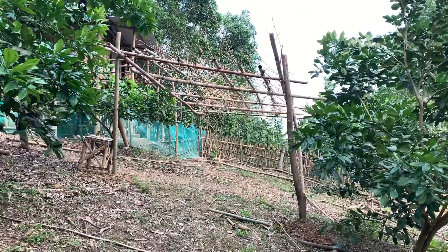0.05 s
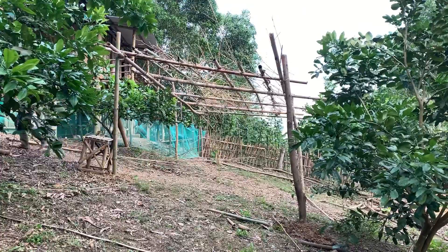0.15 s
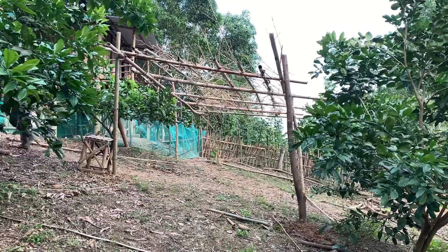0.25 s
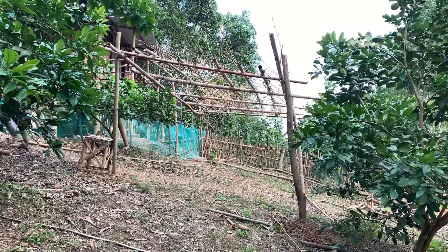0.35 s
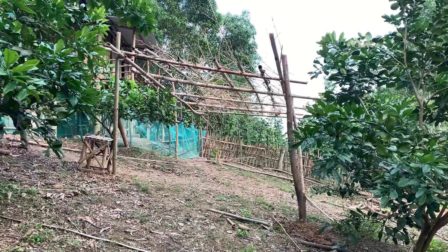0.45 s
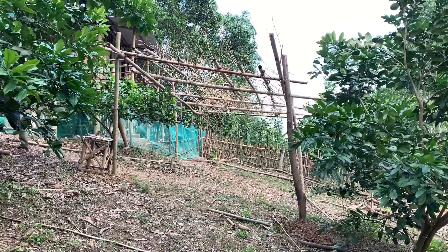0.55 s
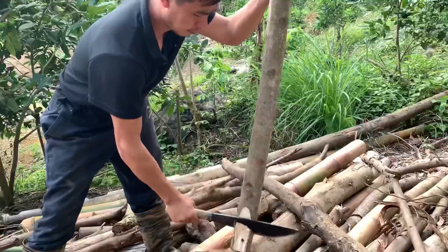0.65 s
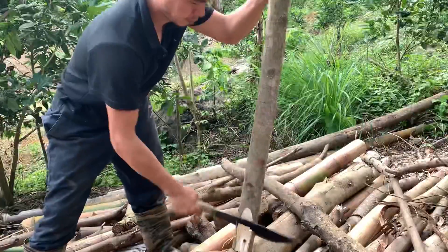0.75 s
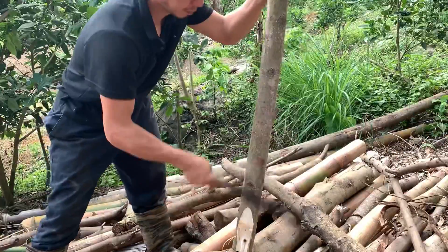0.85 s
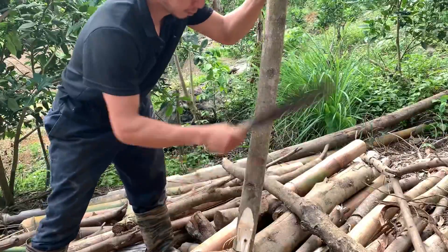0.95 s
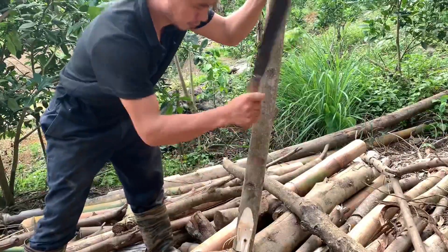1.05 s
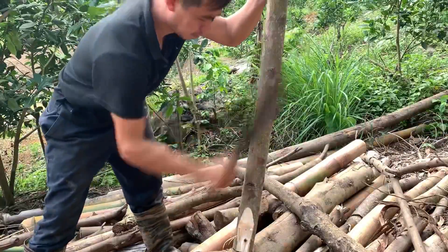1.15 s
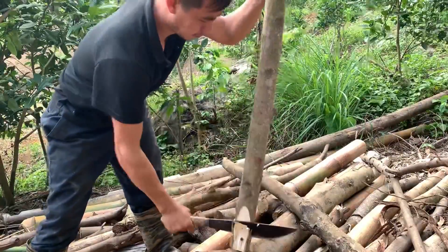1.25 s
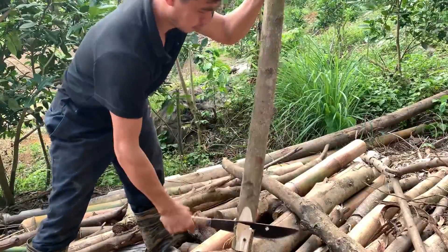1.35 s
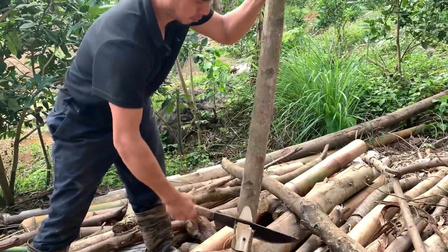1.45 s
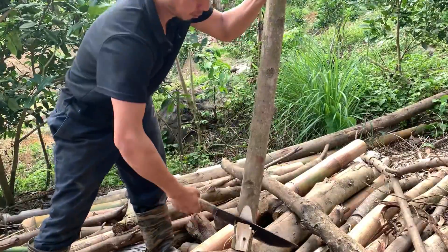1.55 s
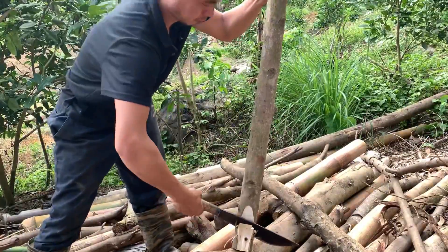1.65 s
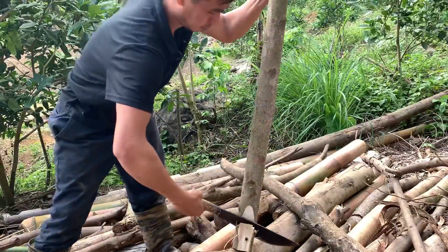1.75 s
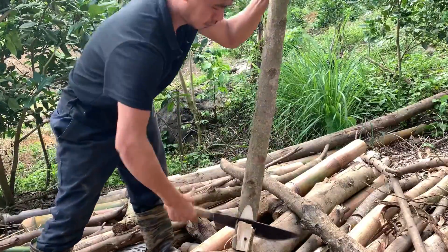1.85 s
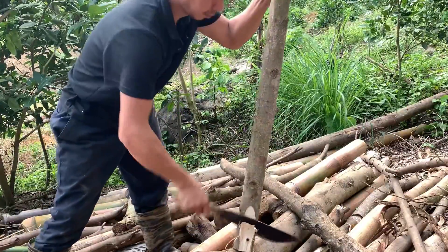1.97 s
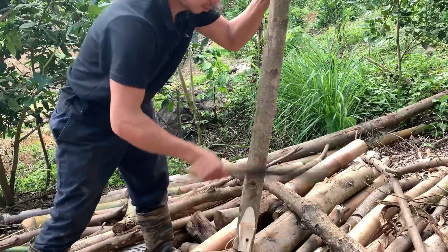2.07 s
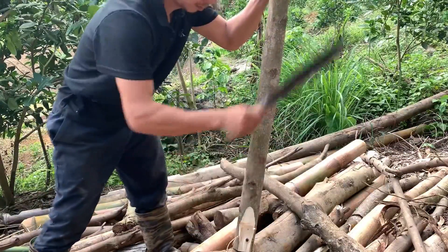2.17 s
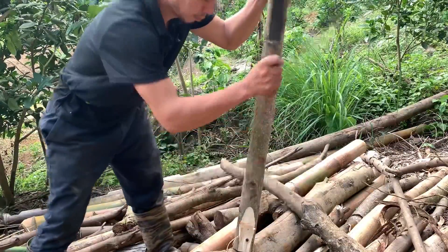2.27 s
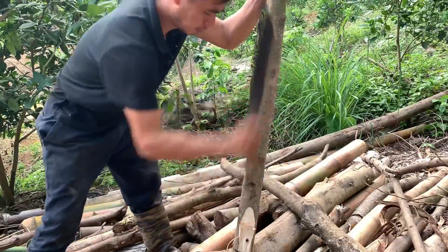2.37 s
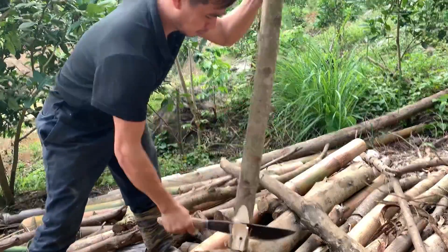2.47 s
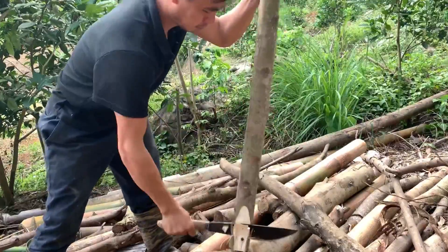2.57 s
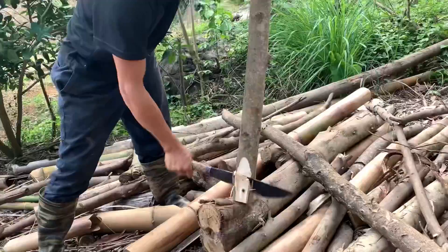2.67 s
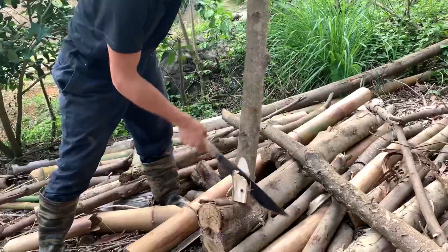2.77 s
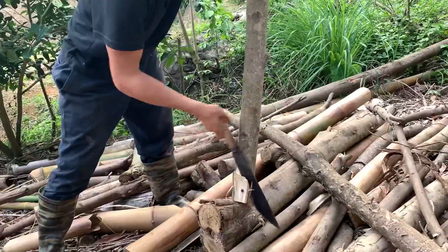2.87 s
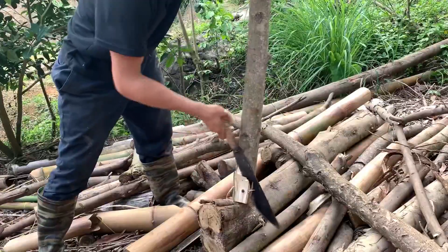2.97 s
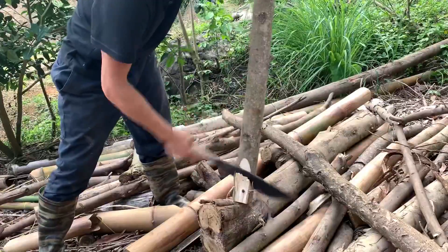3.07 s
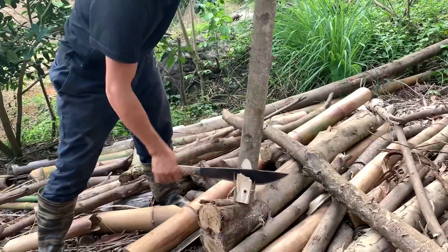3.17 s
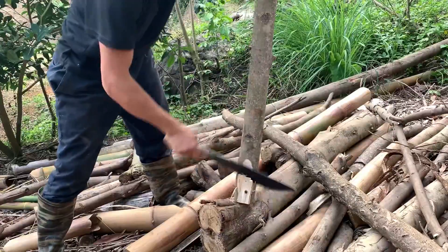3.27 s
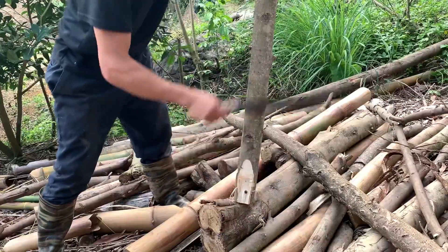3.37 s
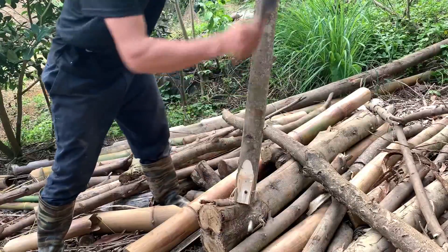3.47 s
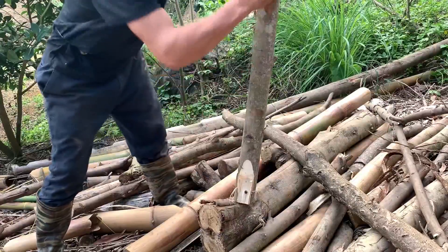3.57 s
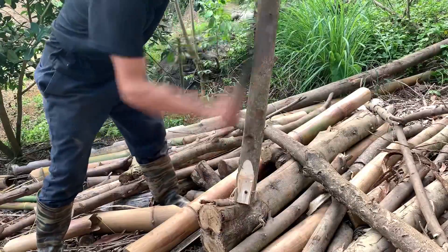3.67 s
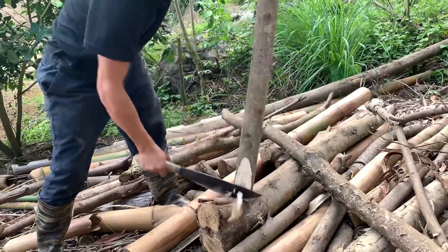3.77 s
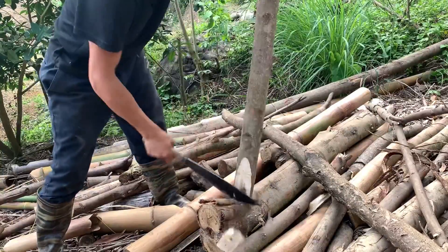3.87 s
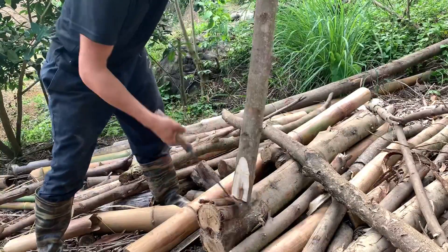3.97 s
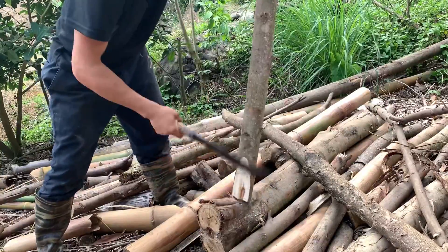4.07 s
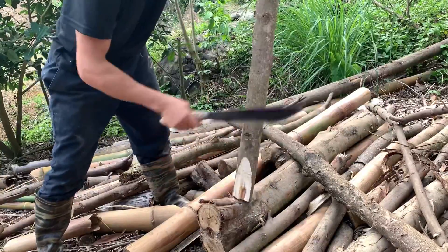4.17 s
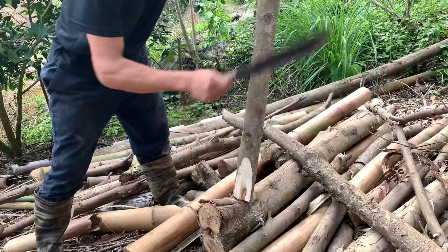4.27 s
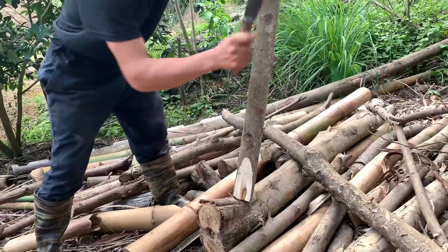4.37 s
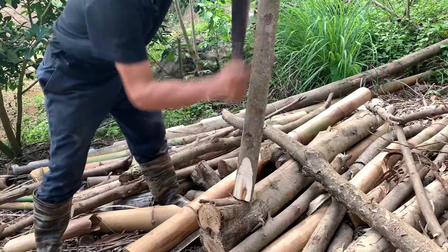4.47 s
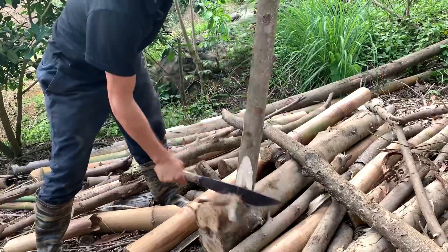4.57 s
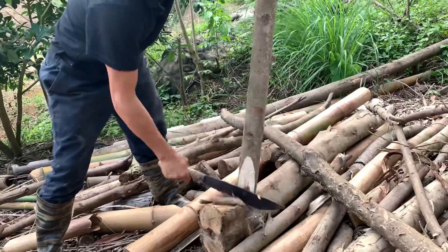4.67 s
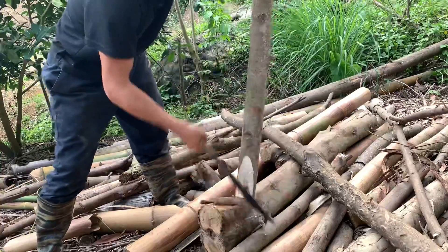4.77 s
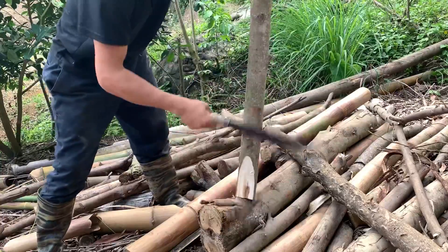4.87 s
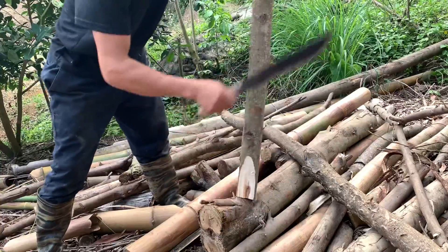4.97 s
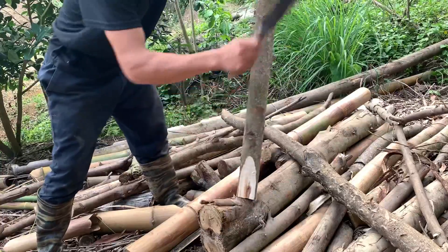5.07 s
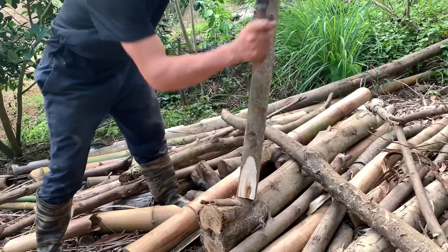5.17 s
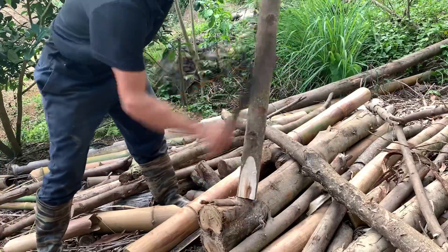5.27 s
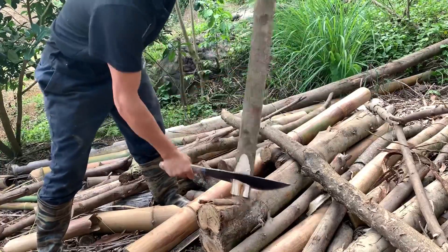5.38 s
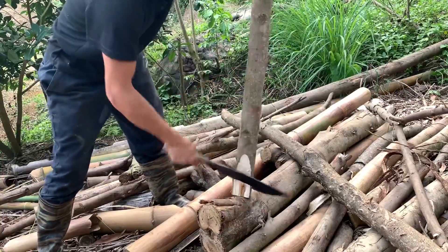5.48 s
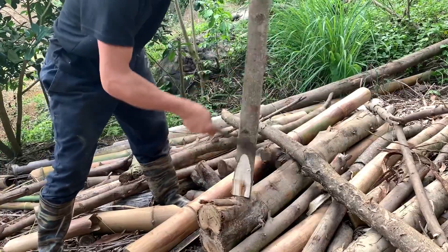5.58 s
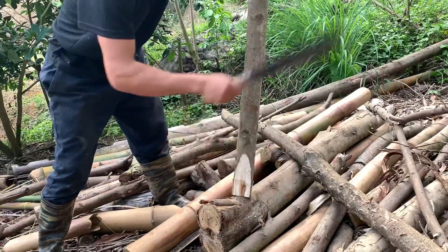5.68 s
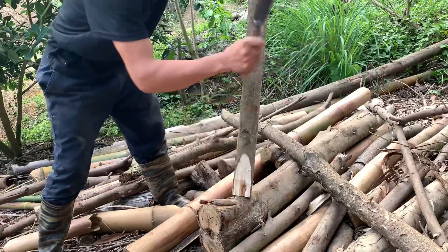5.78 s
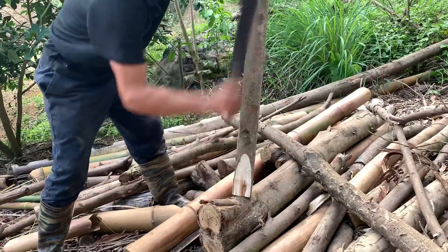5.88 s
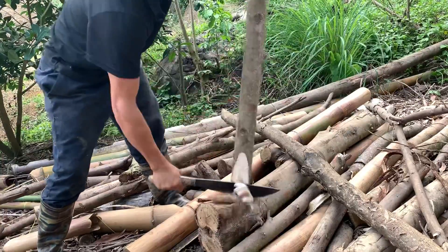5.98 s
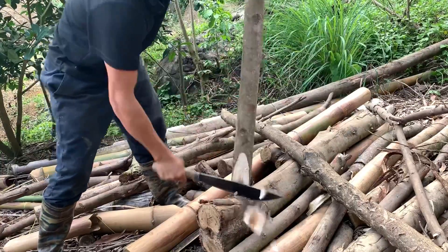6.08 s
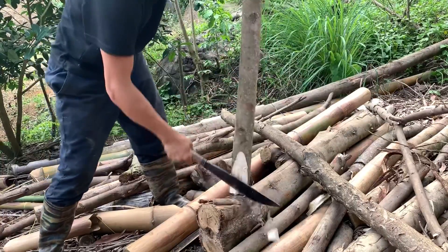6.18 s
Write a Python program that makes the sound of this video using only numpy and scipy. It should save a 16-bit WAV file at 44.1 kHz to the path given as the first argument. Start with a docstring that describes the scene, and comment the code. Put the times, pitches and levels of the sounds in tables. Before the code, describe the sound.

Soft bird hoots over faint insect hiss, then a heavy knife chops green wood in seven sharp, irregular blows as wind buffets the microphone.

```python
"""Calm orchard air with hissing insects: a far bird hoots softly, in near-pure tones with throbbing side tones.
At 0.6 s the scene cuts to a second, windier one: coloured noise in eddies and pops buffets the microphone,
the leaf hiss is louder, and a heavy knife trims the end of a green pole on a log pile in seven blows: short
rising noise, bursts of grainy tearing, a knock and a thud ringing damped wood modes, a short scattered tail.
Small clicks and notes sound around the blows, some of them the blows' own knocks; soft taps ring the steel."""
import sys
import numpy as np
from scipy import signal
from scipy.fft import rfft, irfft, next_fast_len
from scipy.io import wavfile
from scipy.ndimage import uniform_filter1d

SR = 44100
rng = np.random.default_rng(int(sys.argv[2]) if len(sys.argv) > 2 else 0)


def unload_wav(signal):
    """Save mono or channel-first audio to the path in sys.argv[1] as 16-bit WAV at rate SR, clipped to [-1, 1]."""
    wavfile.write(
        sys.argv[1],
        SR,
        np.round(np.clip(np.atleast_2d(signal).T, -1, 1) * 32767).astype(np.int16),
    )


N = 274743

# knife blows: (t/s, cut length/s, entry splinter level/dB, split splinter level/dB, snap level/dB, tear level/dB,
# edge delay/s, edge level/dB, edge centre f/Hz, knock level/dB, knock centre f/Hz,
# thud delay/s, thud level/dB, thud pitch f/Hz)
KNIFE_BLOWS = [(0.6208, 0.0054, 5, -8, -22, -19, 0.0013, -22, 1460, -19.5, 1230, 0.0085, -25, 357),
               (1.2045, 0.0082, -18, 6.5, 7.5, 1, 0.0025, -15, 1275, -7.5, 1250, 0.014, -12.5, 302),
               (2.441, 0.0089, -5, 3, -13, 5.5, 0.0073, -20, 1730, -15, 960, 0.014, -14, 238),
               (3.7316, 0.0061, 0.5, 10, -9, 8.5, 0.0022, -8, 1510, -11, 920, .008, -27, 504),
               (4.5706, 0.018, 8.5, 11, 7, 1.5, 0.00169, -11, 1020, -3, 424, .018, 3, 393),
               (5.332, 0.005, -18, 14, -2, 6, 0.0024, -35, 1330, -14, 1330, 0.0053, -7.5, 665),
               (5.976, 0.0066, 3.5, 15.5, -3, 11, 0.0036, -9.5, 1370, -9, 870, .007, -8, 670)]


def amp(db):
    """Decibels to gain."""
    return 10 ** (np.asarray(db) / 20)


def in_time(rows):
    """Columns of a (t/s, ...) curve, interpolated at every sample."""
    s, *columns = np.transpose(rows)
    return [np.interp(np.arange(N) / SR, s, c) for c in columns]


def noise(spectrum, channels=1):
    """Independent noise per channel, coloured by a (f/Hz, relative level/dB) spectrum; rms 1."""
    hz, db = np.transpose(spectrum)
    size = next_fast_len(N)
    log_grid = np.log(np.fft.rfftfreq(size, 1 / SR) + 1)
    colour = amp(np.interp(log_grid, np.log(hz), db))
    out = irfft(rfft(rng.standard_normal((channels, size))) * colour)[:, :N]
    return out / out.std()


def drift(rate_hz):
    """Slow random signal of standard deviation 1: white noise through two equal poles."""
    r = np.exp(-2 * np.pi * rate_hz / SR)
    slow = signal.lfilter([1], [1, -2 * r, r * r], rng.standard_normal(N + SR))[SR:]
    return slow / slow.std()


def butter(x, hz, kind, order=2):
    """Butterworth filter."""
    return signal.sosfilt(signal.butter(order, hz, kind, fs=SR, output="sos"), x)


def lump(t, rise_s):
    """Rises to 1 in rise_s, then dies away."""
    return t / rise_s * np.exp(1 - t / rise_s)


def add(track, s, sound):
    """Lay a sound into a track at s seconds."""
    at = round(s * SR)
    track[..., at:at + sound.shape[-1]] += sound[..., :N - at]


def ring(force, hz, t60_s):
    """Damped resonator: a unit click sets off a sinusoid of height 1."""
    r, w = amp(-60 / (t60_s * SR)), 2 * np.pi * hz / SR
    return signal.lfilter([.5, 0, -.5], [1, -2 * r * np.cos(w), r * r], force + 1e-18)


def contacts():
    """Entry, bite, split with a snap, stop and thud on the log, closely overlapping, each at its own delay."""
    split_share = 0.61   # how far through the cut the wood splits
    edge_share = 0.33   # rise of the edge's bite, as a share of the cut
    entry_tear_db = -17.5   # against the blow's tear
    entry_s, split_s, snap_s, stop_s = .003, .002, .0004, .0026   # rise times
    rows, off = [], -np.inf
    for (s, cut_s, entry_db, split_db, snap_db, tear_db, edge_lag_s, edge_db, edge_hz,
         knock_db, knock_hz, thud_lag_s, thud_db, thud_hz) in KNIFE_BLOWS:
        split = s + split_share * cut_s
        rows += [(s, tear_db + entry_tear_db, entry_db, off, edge_hz, off, thud_hz, entry_s),
                 (s + edge_lag_s, off, off, edge_db, edge_hz, off, thud_hz, edge_share * cut_s),
                 (split, snap_db, off, off, edge_hz, off, thud_hz, snap_s),
                 (split, tear_db, split_db, off, edge_hz, off, thud_hz, split_s),
                 (s + cut_s, off, off, knock_db, knock_hz, off, thud_hz, stop_s),
                 (s + thud_lag_s, off, off, off, knock_hz, thud_db, thud_hz, stop_s)]
    return rows


def small_contacts():
    """Each small contact clicks, then the wood answers with one short note."""
    # small clicks and notes around the blows, some of them the blow's own knocks:
    # (t/s, click level/dB, splinter level/dB, knock level/dB, knock centre f/Hz)
    small_rows = [(0.748, -53, -18, -66, 710), (0.76, -57, -0.5, -57, 2430), (0.7744, -50, -0.5, -44, 1730),
                  (1.499, -57, -21, -62, 1410), (1.533, -56, -18, -62, 1320), (1.5946, -2.5, 6, -33, 1190),
                  (1.6124, -47, -27, -63, 1080), (1.64, -16.5, -6, -39, 2480), (1.659, -24, -11, -49, 1380),
                  (1.6628, -22.5, -8, -74, 719), (1.6896, -29, -14.5, -57, 783),
                  (2.302, -60, -22, -73, 1400), (2.437, -60, -42, -27, 760), (2.742, -52, -19, -50, 1930),
                  (2.791, -60, -50, -48, 1070), (2.806, -62, -17, -47, 1070),
                  (2.8393, -51, 11.5, -32.5, 1380), (3.1417, -22.5, -23, -51, 725),
                  (3.286, -28, -62, -68, 710), (3.752, -19, -4, -21.5, 715),
                  (3.933, -20.5, -17.5, -32, 2340), (3.938, -36, -27, -56, 1900),
                  (4.076, -60, -60, -33.5, 1330), (4.0811, -13, -57, -30, 845),
                  (4.1732, -24.5, -19, -50, 714), (4.724, -50, -45, -42.5, 1920),
                  (4.734, -44, -25, -42, 1620), (4.833, -48, -19.5, -73, 740), (5.16, -56, -16.5, -70, 740),
                  (5.5118, -19, 1, -38.5, 1330), (5.531, -73, -1.5, -48, 736),
                  (6.1744, -46, -60, -37.5, 1250)]
    click_s, knock_lag_s, knock_s = .0011, 0.004, 0.00076   # rise of click; delay and rise of knock
    rows, off = [], -np.inf
    for s, click_db, splinter_db, knock_db, knock_hz in small_rows:
        rows += [(s, click_db, splinter_db, off, knock_hz, off, knock_hz, click_s),
                 (s + knock_lag_s, off, off, off, knock_hz, knock_db, knock_hz, knock_s)]
    return rows


def fibre_bands():
    """Grainy tearing noise, split into a low tear band and a high splinter band, each of peak 1."""
    # colour of tearing fibres: (f/Hz, relative level/dB per Hz)
    tear_spectrum = [(300, -57), (900, -14), (1500, -28), (2500, -14), (4000, -4.5), (5500, -8.5),
                     (8200, -11.5), (10000, -10), (13500, -11), (15000, -12), (16500, -10.5)]
    fibres = noise(tear_spectrum)[0] * amp(2.12 * drift(450))
    tear = butter(fibres, 6340, "low", order=4)
    splinter = butter(fibres, 6740, "high", order=6)
    return np.array([tear / np.abs(tear).max(), splinter / np.abs(splinter).max()])


def blows(rows, spread_db, detune, tail_db, flutter_db, focus_db, sustain):
    """Fibres tear in a swell of grainy noise; an uneven push rings wood modes near the knock and thud pitches."""
    # pole and pile, damped by green wood: (f/Hz, relative level/dB, t60/s before sustain)
    wood_modes = [(195, 7.5, 0.06), (285, 1, 0.045), (392, -5, 0.15), (530, 0, 0.03), (615, 1, .025),
                  (700, 2.5, 0.03), (845, -1, 0.042), (965, -1, .03), (1075, -1, 0.025), (1225, -3, 0.016),
                  (1410, 1.5, 0.02), (1720, 2, 0.024), (1960, -4, 0.018), (2270, -6, 0.016),
                  (2770, -4, .012)]
    tear_sharpness = 1.4   # fibres fall silent sooner than the push
    knock_focus_db = 12   # loss an octave away from the knock's centre
    flutter_rate_hz, flutter_above_hz = 70, 450   # higher rings flutter in level
    crumb_db, crumb_s, crumb_spread_db, crumb_rate_hz = -23.5, 0.011, 7, 250   # cracking after a tear
    t, out = np.arange(SR // 4) / SR, np.zeros(N)
    bands = fibre_bands()
    usual = bands.std(1)
    crumbs = bands[0] * amp(crumb_db + crumb_spread_db * drift(crumb_rate_hz))
    mode_hz, mode_db, mode_t60 = np.transpose(wood_modes)
    flutter = drift(flutter_rate_hz)
    flutter_share = np.clip(np.log2(mode_hz / flutter_above_hz), 0, 1)[:, None]
    for s, tear_db, splinter_db, knock_db, knock_hz, thud_db, thud_hz, rise_s in rows:
        at = min(round(s * SR), N - len(t))
        swell = lump(t, rise_s)
        onset = 1 - np.exp(-t / rise_s)

        # each tear gets the energy its swell has on average
        tear_swell = swell ** tear_sharpness
        torn = tear_swell * bands[:, at:at + len(t)]
        evened = usual * np.linalg.norm(tear_swell) / np.linalg.norm(torn, axis=1)
        sound = (amp([tear_db, splinter_db]) * evened) @ torn
        sound = sound + amp(tear_db) * crumbs[at:at + len(t)] * onset * np.exp(-t / crumb_s)

        # the pile keeps rattling briefly
        shaking = swell + amp(tail_db) * onset * np.exp(-t / .016)
        push = rng.standard_normal(len(t)) * shaking
        level_chance, pitch_chance = rng.standard_normal((2, len(wood_modes)))
        knock = amp(knock_db - knock_focus_db * np.log2(mode_hz / knock_hz) ** 2)
        thud = amp(thud_db - focus_db * np.log2(mode_hz / thud_hz) ** 2)
        strength = (knock + thud) * amp(mode_db + spread_db * level_chance)
        pitch_hz = mode_hz * (1 + detune * pitch_chance)   # the pole rests differently every time
        rings = np.array([ring(push, hz, sustain * t60) for hz, t60 in zip(pitch_hz, mode_t60)])
        starts = rng.integers(0, N - len(t), (len(wood_modes), 1))
        rings = rings * amp(flutter_db * flutter_share * flutter[starts + np.arange(len(t))])
        add(out, s, sound + (strength / np.abs(rings).max(1)) @ rings)
    return out


def lead_in_noise():
    """Short band noise rising exponentially just before each blow."""
    level_db, rise_s, band_hz = -31.5, 0.003, [970, 6730]
    t, growth = np.arange(SR // 20) / SR, np.zeros(N)
    for s, *_ in KNIFE_BLOWS:
        add(growth, s - t[-1], np.exp((t - t[-1]) / rise_s))
    band = butter(rng.standard_normal(N), band_hz, "band")
    return amp(level_db) * growth * band / band.std()


def blade():
    """Soft taps leave thin, decaying steel tones."""
    # light taps on the steel: (t/s, level of each blade mode/dB x 3)
    tap_rows = [(0.821, -42, -41, -48), (3.274, -41.5, -75, -75), (6.176, -36, -84, -77)]
    # blade modes: (f/Hz, t60/s)
    steel_modes = [(7865, .17), (9658, .14), (13210, .16)]
    out, t = np.zeros(N), np.arange(SR // 4) / SR
    for s, *levels_db in tap_rows:
        for (hz, t60), db in zip(steel_modes, levels_db):
            envelope = amp(db - 60 * t / t60) * (1 - np.exp(-t / .003))
            add(out, s, envelope * np.sin(2 * np.pi * hz * t + rng.uniform(0, 2 * np.pi)))
    return out


def ports(x):
    """Each port hears its own ground echo; the left one falls behind in the treble and is shaded in two bands."""
    # ground echo, rows left and right: (delay/s, level/dB)
    ground_echoes = [(.00031, -20), (.0004, -47)]
    # all-passes that delay the left port by a full cycle: (f/Hz, width/Hz)
    phase_turns = [(8600, 1200), (11700, 2000), (15000, 2200)]
    left, right = (x + amp(db) * np.interp(np.arange(N) - lag_s * SR, np.arange(N), x)
                   for lag_s, db in ground_echoes)
    for hz, width_hz in phase_turns:
        r, w = np.exp(-np.pi * width_hz / SR), 2 * np.pi * hz / SR
        poles = [1, -2 * r * np.cos(w), r * r]
        left = signal.lfilter(poles[::-1], poles, left)
    low_shade = 0.32 * butter(left, [550, 1000], "band", order=1)
    high_shade = 0.68 * butter(left, [4500, 8000], "band", order=1)
    return np.array([left - low_shade - high_shade, right])


def scatter(x, t60_low_s, t60_high_s, high_db):
    """Logs and leaves send back a short, lumpy noise tail with its own decay in the treble."""
    lump_db, lump_rate_hz = 4, 120   # the tail's level fluctuates unevenly
    t = np.arange(SR // 3) / SR
    lumps = amp(lump_db * drift(lump_rate_hz)[:2 * len(t)].reshape(2, -1))
    white = rng.standard_normal((2, len(t))) * (1 - np.exp(-t / 0.00043)) * lumps
    low = butter(white, [500, 2500], "band", order=1) * amp(-60 * t / t60_low_s)
    high = butter(white[::-1], [2500, 13000], "band") * amp(high_db - 60 * t / t60_high_s)
    echoes = signal.fftconvolve(x[None], low + high, axes=1)[:, :N]
    return echoes * amp(lump_db * drift(lump_rate_hz))


def wind():
    """Steady turbulence plus single eddies that thump in and die away; the same pressure reaches both sides."""
    # wind on the microphone, before eddies and drift: (t/s, steady buffet level/dB)
    steady_curve = [(0, -61), (.57, -57.5), (.63, -37.5), (1.0, -55.5), (1.1, -39), (2.4, -41),
                    (2.95, -38.5), (3.15, -34), (3.7, -29.5), (3.85, -34.5), (4.1, -32), (4.55, -31),
                    (4.7, -31.5), (5.1, -29.5), (6.23, -29.5)]
    # colour of the deep buffet: (f/Hz, relative level/dB per Hz)
    buffet_spectrum = [(20, -51.5), (35, -8.5), (55, 1), (90, 0), (140, -6), (220, -20), (400, -54.5)]
    # colour of the brighter roar: (f/Hz, relative level/dB per Hz)
    roar_spectrum = [(60, -16.5), (120, -8.5), (170, 0.5), (260, -5), (400, -14.5), (600, -29.5),
                     (900, -70.5)]
    # strong eddies: (t/s, buffet level/dB, roar level/dB)
    eddy_rows = [(0.651, -51, -35), (0.891, -42, -49), (1.042, -28, -49), (1.294, -52, -38.5),
                 (1.534, -32, -54), (1.824, -52, -50), (2.558, -30, -45), (2.821, -30, -46),
                 (3.012, -28.5, -46), (3.149, -29, -31), (3.189, -22.5, -25), (3.318, -33.5, -61),
                 (3.391, -24.5, -26.5), (3.416, -25, -37), (3.458, -37, -36), (3.609, -20.5, -36),
                 (3.918, -28.5, -44), (4.258, -31.5, -34), (4.352, -38, -59), (4.445, -30.5, -42),
                 (4.522, -25.5, -39), (4.907, -36, -42), (5.06, -26, -26.5), (5.239, -35, -33.5),
                 (5.305, -45, -27), (5.435, -35, -26.5), (5.61, -37, -38), (5.74, -58, -24.5),
                 (5.791, -41, -40), (5.867, -31, -50), (6.044, -46, -31.5), (6.11, -58, -63),
                 (6.176, -26.5, -62)]
    roar_db, roar_slope = -33.5, 1.91   # roar at a buffet of -29 dB; dB of roar per dB of buffet
    eddies_per_s, eddy_db, eddy_spread_db = 13, -13.5, -11   # lesser random eddies, against the steady wind
    steady_db, = in_time(steady_curve)
    t = np.arange(SR // 4) / SR
    born = (rng.random(N) < eddies_per_s / SR) * amp(eddy_db + eddy_spread_db * rng.standard_normal(N))
    lumpy = amp(4.0 * drift(16)) * (1 + signal.fftconvolve(born, lump(t, 0.008))[:N])
    buffet = lumpy * amp(steady_db)
    roar = lumpy * amp(roar_db + roar_slope * (steady_db + 29) + 2.0 * drift(26))
    deep, bright = noise(buffet_spectrum)[0], noise(roar_spectrum)[0]
    for s, eddy_buffet_db, eddy_roar_db in eddy_rows:
        for track, air, shape in ((buffet, deep, amp(eddy_buffet_db) * lump(t, 0.01)),
                                  (roar, bright, amp(eddy_roar_db) * lump(t, .009))):
            met = air[round(s * SR):][:len(t)]
            # every eddy carries its full energy
            evened = np.linalg.norm(shape) / np.linalg.norm(shape[:len(met)] * met)
            add(track, s, shape * evened)
    # hard gusts tear into brighter noise
    crest = butter(rng.standard_normal(N), [350, 850], "band") * amp(7.5) * roar ** 2
    pressure = deep * buffet + bright * roar + crest + pops()
    return butter(butter(pressure, 900, "low", order=4), 45, "high")


def pops():
    """Sharp wind pops on the microphone: each a short pressure pulse of either sign, rebounding on both flanks."""
    # pops, before the wind's filters: (t/s, centred three half widths later; peak level/dB)
    pop_rows = [(3.152, -28), (3.19, -19), (3.197, -19), (3.286, -32), (3.392, -32), (3.42, -20),
                (3.456, -30), (3.65, -33), (4.273, -25.5), (4.523, -43), (5.06, -26.5), (5.069, -14.5),
                (5.248, -38), (5.311, -26), (5.439, -26), (5.746, -22), (6.064, -27), (6.168, -25)]
    half_width_s = 0.00072   # nominal
    out, u = np.zeros(N), np.arange(-200, 200) / SR
    for s, db in pop_rows:
        width_s = half_width_s * rng.uniform(.85, 1.2)
        pulse = (1 - (u / width_s) ** 2) * np.exp(-(u / width_s) ** 2 / 2)
        add(out, s + 3 * half_width_s + u[0], rng.choice([-1, 1]) * amp(db) * pulse)
    return out


def orchard():
    """Leaf hiss, diffuse below the top treble, and two noise bands of insect chorus that waver apart."""
    # colour of the leaf hiss: (f/Hz, relative level/dB per Hz)
    leaf_spectrum = [(180, -30), (300, -10), (500, -10.5), (900, -17), (1700, -18), (4400, -18.5),
                     (7500, -22), (10300, -23), (13800, -25), (14800, -24), (16500, -77)]
    # leaf hiss in the second scene, before drift: (t/s, level/dB)
    rustle_curve = [(0.66, -49), (0.78, -53.5), (1.09, -53), (1.33, -50.5), (1.85, -51), (2.02, -52),
                    (2.6, -52), (4.16, -51), (4.61, -48), (4.83, -53), (5.03, -53.5), (5.51, -50.5),
                    (5.98, -52.5), (6.23, -49)]
    # chorus bands: (f/Hz, width/Hz, first scene level/dB, second scene level/dB, waver/dB)
    insect_bands = [(4420, 900, -69, -64, 3.0), (6730, 2200, -58.5, -60.5, .8)]
    scene_cut_s, first_leaves_db = .6, -60.5   # cut to the second, windier scene; leaf hiss before it
    near_hz = 10500   # above this the hiss comes from one nearby bush
    in_first = np.arange(N) < scene_cut_s * SR
    chorus = np.zeros((2, N))
    for hz, width_hz, first_db, second_db, waver_db in insect_bands:
        level_db = np.where(in_first, first_db, second_db) + waver_db * drift(7)
        chorus += amp(level_db) * noise([(hz - width_hz, -30), (hz, 0), (hz + width_hz, -30)], channels=2)
    leaves = noise(leaf_spectrum, channels=2)
    near = ports(butter(leaves[0], near_hz, "high", order=4))
    leaves = butter(leaves, near_hz, "low", order=4) + near
    rustle_db, = in_time(rustle_curve)
    return leaves * amp(np.where(in_first, first_leaves_db, rustle_db) + 1.0 * drift(6.5)) + chorus


def bird():
    """Near-pure hoots that swell, fade and arch in pitch; a throb adds tones above and below."""
    # far bird, a row a hoot:
    # (t/s, length/s, mid-hoot f/Hz, level/dB, arch depth/Hz, throb f/Hz, side tone level/dB)
    hoot_rows = [(0.132, 0.036, 529, -58, 4, 150, -76), (0.237, 0.035, 574, -50.5, 26, 149, -72),
                 (0.348, 0.055, 510, -54.5, -36, 168, -59.5), (0.424, 0.085, 453, -59, 10, 131, -54.5),
                 (0.513, 0.058, 480, -51.5, 107, 151, -62)]
    peak_share = 0.3   # how far through a hoot its swell peaks
    out = np.zeros(N)
    waver, unsteady = drift(91), drift(44)
    for s, length_s, pitch_hz, db, arch_hz, throb_hz, side_db in hoot_rows:
        t = np.arange(round(length_s * SR)) / SR
        at = slice(round(s * SR), round(s * SR) + len(t))
        swell = np.sin(np.pi / 2 * np.interp(t / length_s, [0, peak_share, 1], [0, 1, 0])) ** 0.8
        phase = 2 * np.pi * np.cumsum(pitch_hz - arch_hz * (2 * t / length_s - 1) ** 2) / SR
        throb = 2 * np.pi * throb_hz * t + 1.2 * unsteady[at]
        sides = np.sin(phase + throb) + 0.45 * np.sin(phase + 2 * throb) + 0.3 * np.sin(phase - throb)
        tone = np.sqrt(2) * amp(db + 2.0 * waver[at]) * np.sin(phase)
        add(out, s, swell * (tone + amp(side_db) * sides))
    return out


def scene():
    """Blows and small contacts with their scatter, lead-in noise, steel, wind, orchard air and bird."""
    # focus_db: loss an octave away from the thud's pitch
    cuts = blows(contacts(), spread_db=1.5, detune=.02, tail_db=-18, flutter_db=3.5, focus_db=70, sustain=1)
    # a small contact finds one note and rings longer
    small = blows(small_contacts(), spread_db=1.5, detune=.015, tail_db=-20, flutter_db=1.5,
                  focus_db=170, sustain=1.7)
    small = butter(small, 11800, "low", order=3)   # duller than the blows
    cuts, small = butter([cuts, small], 170, "high")   # both have little bass
    # small contacts are drier: 5 dB less scatter
    echoes = amp(-38) * scatter(cuts + amp(-5) * small, 0.093, 0.12, high_db=-7.5)
    near = ports(cuts + small + lead_in_noise() + blade())
    hoots = bird()
    far = hoots + amp(-26.5) * scatter(hoots, 0.13, 0.1, high_db=-10)   # blurred among the trees
    return near + echoes + wind() + orchard() + far


def record(dry):
    """The bass is mono; gain control ducks loud moments and recovers; peaks are rounded, both ends are cut."""
    mono_below_hz, cutoff_hz = 450, 17100
    threshold_db, cut_per_db = -23.0, .45
    recovery_db_per_s, smoothing_s = 570.0, 0.0081
    mid = dry.mean(0)
    side = butter((dry[0] - dry[1]) / 2, mono_below_hz, "high")
    mic = mid + side * [[1], [-1]]
    level_db = 20 * np.log10(uniform_filter1d(np.abs(mic).max(0), 400) + 1e-6)
    # hold the level's peaks and let them fall at a steady rate
    fall_db = recovery_db_per_s * np.arange(N) / SR
    held_db = np.maximum.accumulate(level_db + fall_db) - fall_db
    over_db = np.maximum(held_db - threshold_db, 0)
    r = np.exp(-1 / (smoothing_s * SR))
    gain = amp(-cut_per_db * signal.lfilter([1 - r], [1, -r], over_db))
    rounded = butter(.8 * np.tanh(mic * gain / .8), 35, "high")
    return signal.sosfilt(signal.cheby2(14, 100, cutoff_hz, fs=SR, output="sos"), rounded)


dry = scene()
out = record(dry)
unload_wav(out)
```